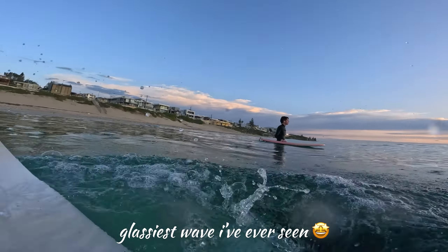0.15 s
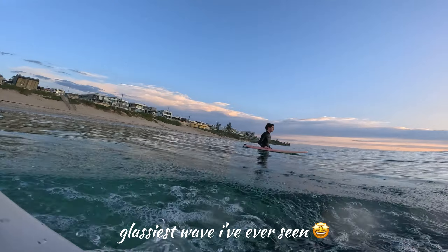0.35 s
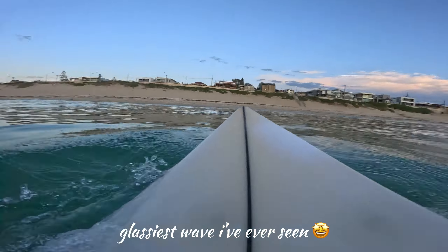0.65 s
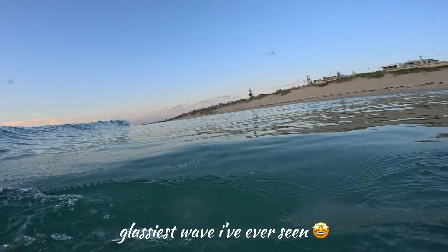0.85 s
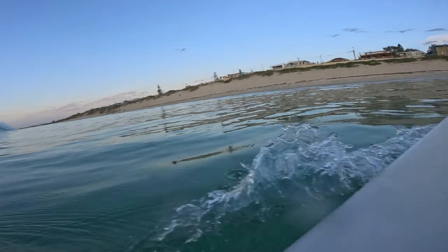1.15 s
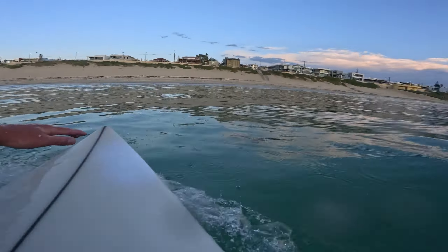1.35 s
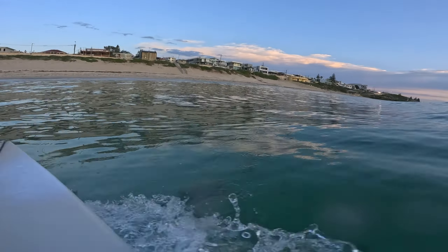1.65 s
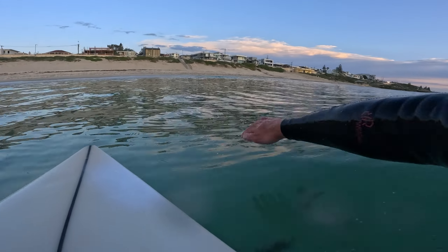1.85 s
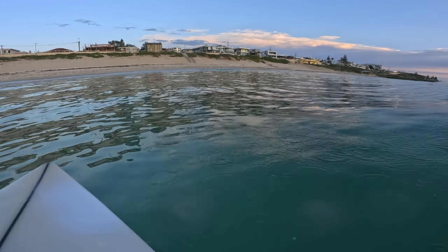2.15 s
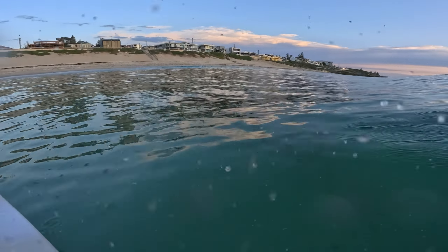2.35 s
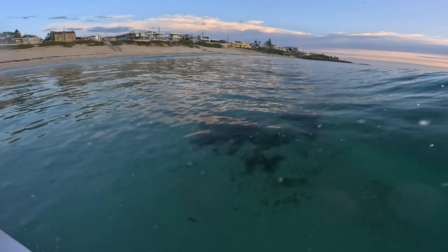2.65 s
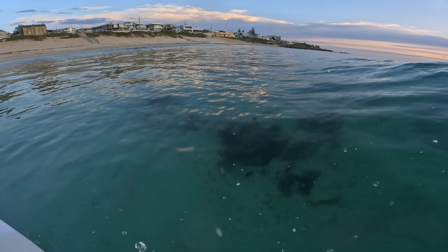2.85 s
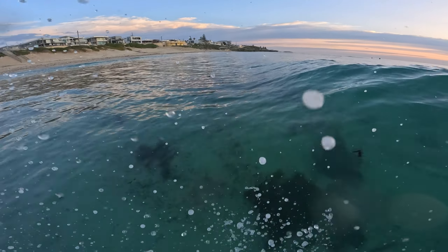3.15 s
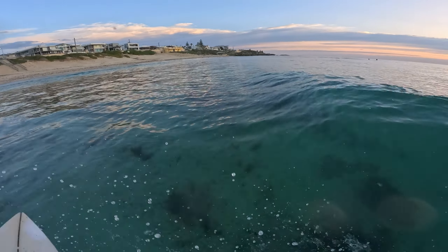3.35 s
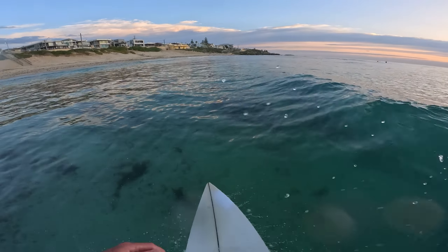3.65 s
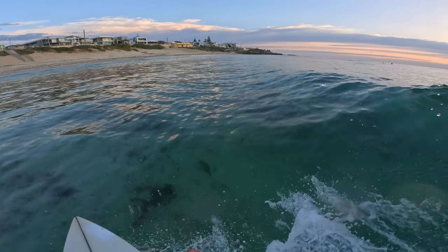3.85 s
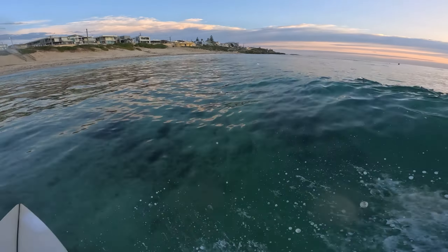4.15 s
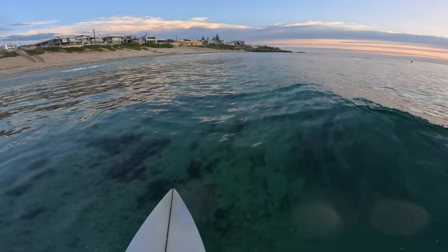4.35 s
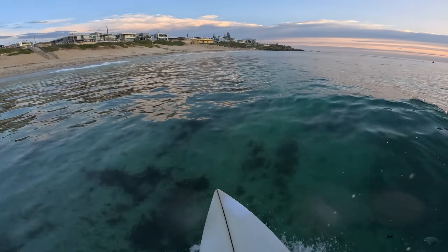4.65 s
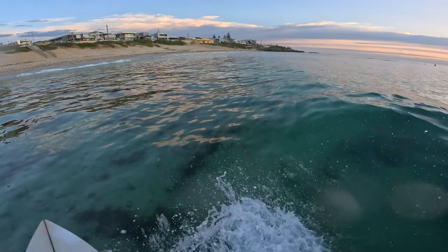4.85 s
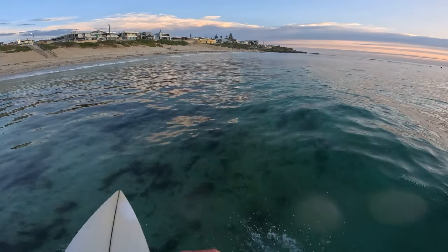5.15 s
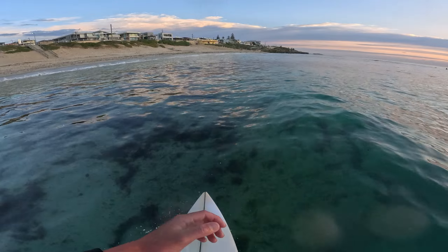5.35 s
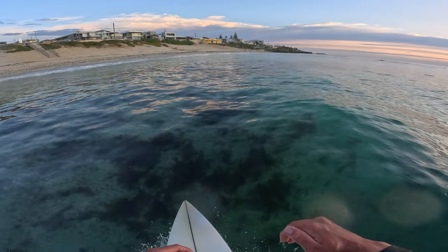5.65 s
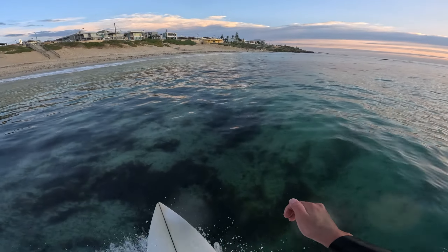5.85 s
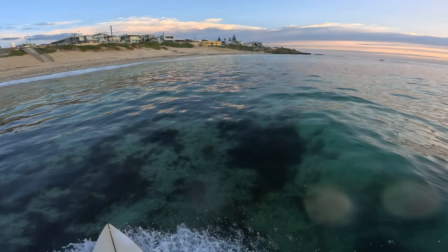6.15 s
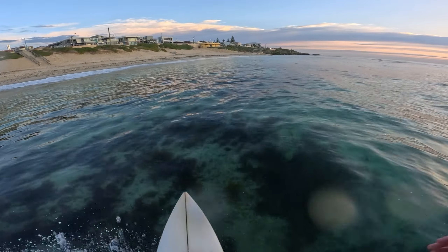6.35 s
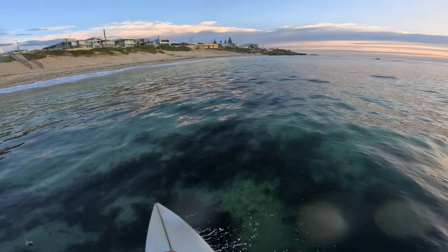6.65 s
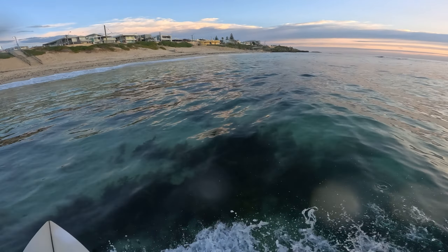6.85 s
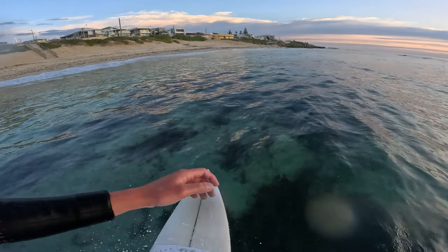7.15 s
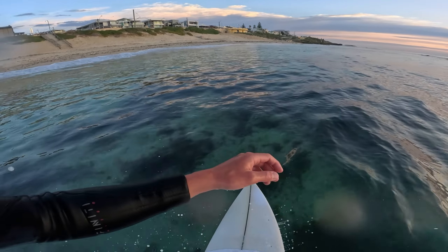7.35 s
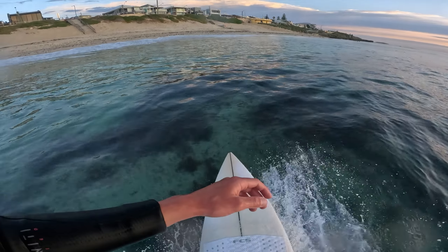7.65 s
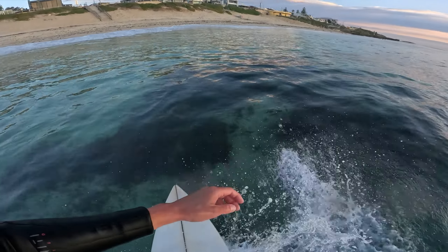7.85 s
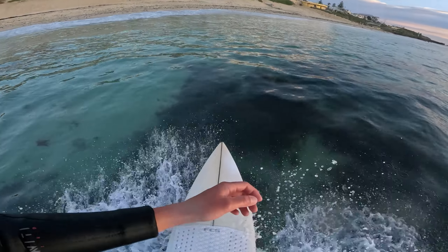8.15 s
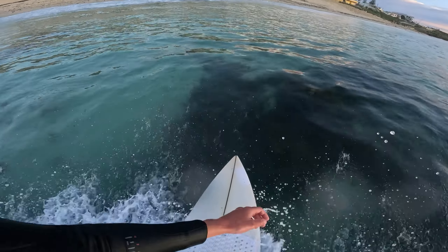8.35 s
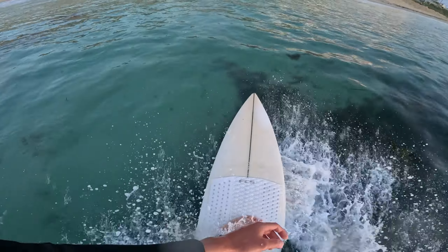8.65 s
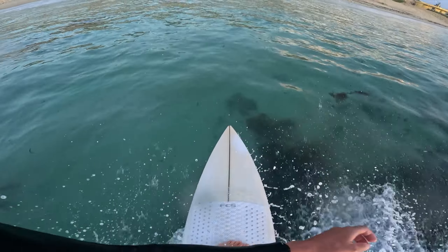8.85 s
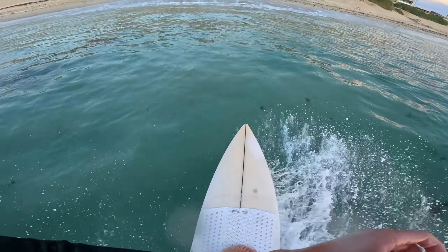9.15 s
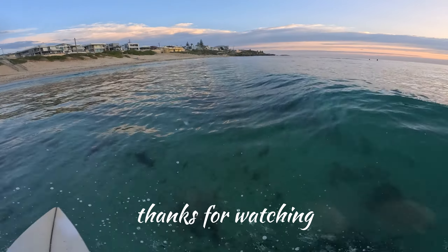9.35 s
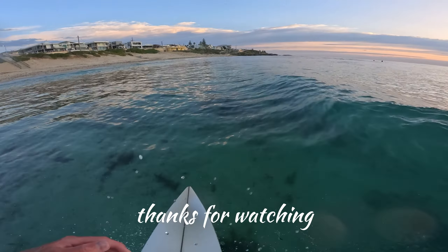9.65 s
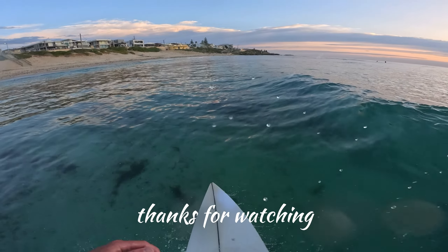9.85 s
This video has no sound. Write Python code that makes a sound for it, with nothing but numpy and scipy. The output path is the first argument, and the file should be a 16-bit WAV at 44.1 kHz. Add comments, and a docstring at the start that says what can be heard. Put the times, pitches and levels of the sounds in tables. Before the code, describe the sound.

Water rushes and fizzes along a surfboard at sea, bubbles blipping and drops ticking early, while low wind buffets the microphone, then cuts off abruptly.

```python
"""Low over a surfboard

Water rushes and fizzes along the rails: patchy noise in five registers, with swarms of damped sines for
droplets and small bubbles. Big bubbles and drops on the camera housing are single damped sines.
Wind buffets both ports as partly shared turbulent noise. The camera spreads the water over both channels
with a phase shift, the wash dips suddenly and creeps back, and the sound stops abruptly."""
import sys
import numpy as np
from scipy import signal
from scipy.fft import rfft, irfft, next_fast_len
from scipy.io import wavfile
from scipy.ndimage import uniform_filter1d, map_coordinates

SR = 44100
rng = np.random.default_rng(int(sys.argv[2]) if len(sys.argv) > 2 else 0)


def digitize_waveform(pressure):
    """Quantize a signal to 16-bit integers and store it at the path in sys.argv[1].

    Rows of a 2-D input are taken as channels; values are limited to [-1, 1].
    """
    field = np.atleast_2d(pressure).T
    bounded = np.clip(field, -1, 1)
    quanta = np.round(bounded * 32767).astype(np.int16)
    wavfile.write(sys.argv[1], SR, quanta)


N = 440994
STOP_S, TOP_HZ = 9.2512, 13400  # abrupt end, upper band limit
DIP_FALL_S = 0.004  # time constant of a dip's fall

# Wind at the ports: t/s, level/dB, then rumble/dB, rasp/dB, hollow tone/dB relative to the flutter
WIND_LEVELS = [(0, -45, -6, 0, -2.5), (.6, -45.5, 4.5, -1, 9.5), (1.1, -47.5, 10, 7.5, 14),
               (1.5, -43.5, 7.5, 1, 9), (1.8, -32.5, 2, -0.5, 0), (2.3, -31, -6.5, -2, 2.5),
               (2.5, -27, 0, -8.5, -0.5), (2.62, -23, -3.5, -6.5, -5), (3.1, -26, 2.5, -3.5, -3.5),
               (3.56, -27, 1.5, -0.5, 2.5), (3.85, -27.5, -2, 0, -1), (4.2, -26, -1, -10, -4.5),
               (4.9, -23.5, -1, -8, -4), (5.4, -29, 0.5, -10, -7.5), (5.9, -28.5, 0.5, -4, 1),
               (6.4, -31, 1, -2, 0.5), (6.7, -30, -0.5, -4, -2), (7, -27, -3, -8.5, -2),
               (7.7, -27.5, 1, 2, -9.5), (8.2, -27.5, -0.5, 0, -5.5), (8.7, -26.5, 4, 1.5, 1),
               (9.25, -28.5, 0.5, 1, -4)]
# Where the wind strikes, left over right: t/s, flutter and rasp/dB, rumble/dB
WIND_FACING = [(0, -2, 3.5), (.55, -2, 2.5), (.8, 2.5, 0), (1.5, 6, 5), (1.7, 3, -12.5), (2.25, 0, -16.5),
               (2.4, -1.5, -2), (3.2, 5.5, -7.5), (3.8, 6, -18), (4.3, -4, -5.5), (5.5, 0, -5.5),
               (6, -1.5, -6.5), (6.5, -0.5, -7.5), (7.4, -1.5, -4), (9.25, 0, -3)]
# Puffs on the left port: t/s, half-width/s, left over right/dB, lift of rasp and hollow tone/dB
WIND_PUFFS = [(1.75, 0.085, 5.5, -3), (2.24, 0.045, 2, -1), (2.58, .08, 4.5, 2.5), (3.28, 0.069, 4, -2),
              (3.62, 0.046, 4.5, -2.5), (3.79, 0.038, 2, 1.5), (4.1, 0.11, 6.5, 2.5), (7.1, 0.056, 13.5, 4),
              (7.65, 0.11, 10, 2), (8.117, 0.067, 16, 1), (8.66, 0.12, 9.5, -4), (9.12, 0.073, 8, -3)]
# Short gusts and lulls: t/s, half-width/s, flutter/dB, rumble/dB, rasp and hollow tone/dB
WIND_GUSTS = [(0.04, 0.044, 5, -4, -1), (0.19, 0.056, 18, 16, 8.5), (0.32, 0.034, 1, 2, 0),
              (0.44, 0.081, -6.5, -8, 0), (0.56, 0.0233, -3.5, 10, -4.5), (0.69, 0.028, 14, -5, 0.5),
              (0.77, 0.043, -7, 13.5, 1), (0.88, 0.027, -11, -2, -11), (1.07, 0.05, -12, -12, 2.5),
              (1.46, 0.087, -3, -8, 0.5), (1.6, 0.099, -6, 3, 7), (2.16, 0.062, 4.5, 7.5, 5.5),
              (2.3, 0.026, 3.5, -11.5, -9), (2.44, 0.061, -1, -5, -2), (3.24, 0.04, -0.5, 5, 3.5),
              (3.47, 0.085, -2.5, -1.5, -13), (3.6, 0.04, 1, 3, 4), (3.72, 0.075, 2, 2.5, 2),
              (4.86, 0.08, 0, -8, -1), (5.08, 0.048, -9, 1.5, -1.5), (5.36, 0.017, 12, -11, 1),
              (5.44, 0.16, 0.5, -1, 9.5), (6.52, 0.019, 10.5, -3, -1), (6.66, 0.13, 0.5, 2, 7),
              (6.97, 0.062, -8.5, -5.5, -3.5), (7.03, 0.022, -10, -3, -8), (7.78, .04, -2, 1, -4),
              (7.4, 0.1, 1.5, 0.5, 5), (7.5, 0.021, -3, -10, -11), (8.34, 0.16, -2.5, -6.5, -1.5),
              (8.71, 0.16, -5, 1.5, -1.5), (8.93, 0.05, -4, -10.5, -0.5), (9.02, 0.044, -6, -11, -5)]
# Slow pressure swings: t/s, level/dB
HEAVE_LEVEL = [(0, -36.5), (.5, -31), (.7, -27), (1.25, -22), (1.67, -33), (2.3, -30), (2.5, -17.5),
               (2.75, -31), (3.09, -17), (3.3, -34), (4.1, -29), (4.9, -22.5), (5.3, -28), (5.95, -29.5),
               (6.7, -37), (7.1, -23), (7.35, -31), (7.9, -25), (8.32, -33.5), (8.7, -24.5), (9.25, -30.5)]
# Single wind thumps before a common trim: t/s, level/dB, f/Hz, left over right/dB
WIND_THUMPS = [(0.146, -13, 209, -2.0), (0.548, -16, 140, -5.5), (2.078, -14.5, 121, -5),
               (2.231, -14, 202, -9), (2.555, -15, 146, 5), (2.911, -10.5, 200, 3),
               (3.023, -10.5, 73.6, -2), (3.214, -15.5, 72, 2), (3.257, -7.5, 543, 11), (3.57, -8, 567, 9),
               (3.37, -7, 101, -5), (4.232, -11, 109.5, 0), (4.403, -11, 157, -1), (5.336, -15.5, 105, -3),
               (5.485, -7, 336, -4), (6.5113, -6, 157, -5.5), (7.07, -8.5, 600, 11), (7.074, -11, 220, 0),
               (7.115, -9.5, 410, 11), (7.234, -11.5, 120, -5), (7.247, -10.5, 294, -4),
               (7.38, -11.5, 302, 1.5), (7.586, -7, 203, 2), (7.621, -10, 226, 6.5), (7.672, -12, 480, 10),
               (7.697, -10, 200, 0), (8.042, -17, 61.7, 3), (8.057, -9, 250, 3), (8.07, -7.5, 293, 6.5),
               (8.122, -15, 360, 3), (8.191, -15, 63, 8), (8.388, -8.5, 230, -2), (8.558, -12, 119, -2),
               (8.716, -9.5, 74, 1.5), (8.79, -9.5, 124, 6), (8.92, -9.5, 358, 0), (9.075, -14, 136, 6)]
# Spectral colour of the wind at the left port: f/Hz, level/dB
WIND_COLOUR_LEFT = [(40, 5.5), (80, 1), (160, 1.5), (300, -5.5), (480, -14), (650, -4.5), (800, -9.5),
                    (1000, -21.5), (1400, -53.5)]
# Spectral colour of the wind at the right port: f/Hz, level/dB
WIND_COLOUR_RIGHT = [(40, 4), (80, 4.5), (160, 0), (300, -4.5), (480, -9.5), (620, -19), (720, -37.5),
                     (900, -46)]
# Wash before the camera's colouring: t/s, level/dB, then gurgle/dB, spray/dB, top hiss/dB above the fizz
WASH_LEVELS = [(0, -21.5, 1, 1.5, 9.5), (.18, -19.5, 4, -2, 1), (.3, -17.5, 2, -1, -1.5),
               (.4, -19.5, 4, 3, 4), (.47, -23, 10, 4.5, 8), (.57, -20.5, 11.5, 5, 12),
               (.72, -23.5, 7.5, 3, 6.5), (.83, -18.5, 1.5, -0.5, 2.5), (1.1, -20.5, 5, 5, 5),
               (1.6, -21, 7, 3, 7), (1.85, -18.5, 5, 3, -1.5), (2.2, -18.5, 3, 2, 5), (2.6, -19, 7, 9, 6.5),
               (3.1, -18, 6.5, 4, 4.5), (3.5, -19, 3, 5, 3), (3.7, -22, 3.5, 5.5, -1.5),
               (3.95, -16.5, 1, 3.5, -6.5), (4.3, -19, 5.5, 4.5, -1.5), (4.6, -18, 5, 6, -1),
               (5.2, -18.5, 5.5, 6, 8.5), (5.42, -20, 10.5, 5.5, 5.5), (5.62, -16.5, 0.5, 1, 4.5),
               (5.95, -17.5, 4, 6, 9), (6.55, -15.5, 4, 2.5, 4.5), (6.9, -19.5, 0.5, 6.5, 10),
               (7.25, -20, 8, 4.5, 1.5), (7.8, -16, -1, 0.5, -0.5), (8.6, -17, 2.5, 3, 3),
               (8.95, -15, 1.5, 1.5, 1.5), (9.25, -17.5, -1.5, 1, 11)]
# Hollow middle register of the foam: t/s, level above the fizz/dB
MIDDLE_LEVEL = [(0, 3), (.3, 1), (.55, 5), (.62, 8.5), (.74, 6.5), (.77, 4.5), (1.05, 8.5), (1.3, 7),
                (1.6, 9), (1.9, 4.5), (2.2, 5.5), (2.5, 1.5), (2.75, 7.5), (3, 2.5), (3.3, -1), (3.7, 4),
                (4, 1.5), (4.3, 2), (4.5, 0.5), (4.75, 0.5), (4.9, 5.5), (5.15, 2.5), (5.4, 8.5),
                (5.6, -1.5), (5.95, -4), (6.15, 3), (6.5, 2.5), (6.8, 2), (7, 1.5), (7.2, 6), (7.6, 2),
                (8, 1), (8.4, 3), (8.7, -1.5), (8.9, 5), (9.25, -0.5)]
# Crackle mixed into the foam: t/s, share of droplets, share of small bubbles
CRACKLE_SHARES = [(0, 0.46, 0.37), (.45, 0.46, .3), (.65, 0.5, 0.32), (1, 0.42, 0.36), (2.3, 0.34, 0.31),
                  (2.8, 0.174, 0.3), (4, 0.22, 0.27), (9.3, 0.18, 0.13)]
# Splashes that swell out of the wash: t/s, half-width/s, rise/dB
SPLASH_SWELLS = [(.125, 0.014, 6), (.262, .014, 3), (.225, .012, -1), (.365, 0.015, 3.5), (.41, 0.013, 3.5),
                 (.51, 0.013, -0.5), (.84, 0.034, -1), (1.24, .03, 0), (1.37, 0.038, 2), (1.46, 0.016, 2),
                 (1.9, 0.06, 0.5), (2.09, 0.012, 3.5), (2.19, 0.023, 1.5), (2.245, 0.0091, 2.5),
                 (2.36, 0.0096, 1.5), (2.67, 0.023, -0.5), (3.05, 0.022, 0.5), (3.91, .04, 1.5),
                 (4.64, 0.02, 1), (4.74, 0.025, 2), (5.2, 0.027, -1), (6.18, 0.044, -1.5), (6.59, .04, -1),
                 (6.4, .04, -2), (6.78, 0.055, 3), (6.835, 0.0073, 5), (6.96, 0.059, 1.7),
                 (7.21, 0.04, 2.5), (7.47, 0.028, 2), (7.57, 0.015, 0.5), (8.22, .02, -0.5),
                 (8.94, .03, 1.5), (9.21, 0.036, 3)]
# Sudden dips of the wash: t/s, depth setting/dB, recovery time constant/s
WASH_DIPS = [(0.035, 7, 0.032), (0.143, 4, 0.048), (0.276, 9.5, 0.049), (0.53, 4.5, 0.098),
             (0.592, 15, 0.062), (0.645, 3.5, 0.08), (0.725, 5, 0.018), (0.845, 0, 0.112), (0.89, 6, 0.078),
             (0.96, 5.5, 0.027), (1.102, 9, 0.022), (1.231, 8, 0.015), (1.372, 8.5, 0.03),
             (1.47, 5.5, 0.016), (1.625, 2, 0.094), (1.912, 9.5, 0.022), (2.38, 10.5, 0.039),
             (2.52, 6, 0.06), (2.71, 10.5, 0.015), (3.253, 11.5, 0.023), (3.595, 6.5, 0.045),
             (3.78, 5, 0.067), (4.41, 3.5, 0.1), (4.575, 4.5, 0.043), (4.67, 6, 0.019), (5.115, 4, 0.025),
             (6.23, 10.5, 0.06), (6.62, 7, 0.035), (6.847, 5.5, 0.025), (7.592, 7, 0.062),
             (8.11, 4.5, 0.07), (8.86, 6.5, 0.086)]
# Drops on the housing before trims and colouring: t/s, level/dB, f/Hz, bright edge above that level/dB
HOUSING_DROPS = [(0.005, -16, 3000, -26), (0.0094, -8.5, 3550, -29), (0.0293, -6, 4770, -21),
                 (0.072, -18, 4400, -13), (0.117, -15, 3800, -10), (0.141, -6, 3700, -27),
                 (0.178, -9.5, 3830, -25.5), (0.1932, -10, 3360, -20.5), (0.2571, -16, 3530, -23),
                 (0.2746, -8, 3990, -22), (0.3403, -15.5, 3890, -16.5), (0.3576, -15.5, 3340, -25),
                 (0.3952, -20.5, 3650, -19), (0.422, -11, 3600, -24), (0.488, -16, 4500, -11),
                 (0.554, -13, 4260, -5.5), (0.5897, -4.5, 3210, -24.5), (0.603, -25, 3940, -7.5),
                 (0.612, -25, 3360, -2), (0.6676, -14.5, 4440, -23.5), (0.7118, -14, 3880, -26),
                 (0.775, -24, 4090, -19), (0.812, -16, 3000, -26), (0.8286, -8, 3210, -23),
                 (0.9192, -15, 3970, -10), (1.077, -17.5, 3470, -14), (1.225, -11, 3930, -16.5),
                 (1.247, -26, 3880, -25), (1.3481, -10.5, 3960, -24), (1.4965, -22.5, 3200, -20),
                 (1.7227, -10, 2600, -30), (1.8057, -15, 3630, -17), (2.0777, -9, 3950, -17),
                 (2.1066, -14, 3180, -8.5), (2.177, -21, 3690, -21), (2.358, -21, 3760, -23),
                 (2.4313, -35, 3630, -14.5), (3.027, -8.5, 3650, -27.5), (3.6562, -11.5, 3330, -16),
                 (4.4097, -11, 3650, -27), (4.526, -10, 3580, -23), (6.2265, -11.5, 3930, -34),
                 (6.836, -11, 4300, -16), (8.8696, -11, 3420, -19)]
# Big bubbles before colouring: t/s, level/dB, f/Hz at the start, decay time constant/ms
BIG_BUBBLES = [(.075, -11.5, 940, 4), (.228, -12, 1160, 3.4), (.272, -5, 1290, 1.7), (.378, -9, 450, 4),
               (.401, -20, 1294, 3), (.408, -9.5, 782, 3.7), (0.434, -4, 433, 3.6), (.468, -5.5, 584, 2.6),
               (.481, -12, 1674, 3), (.514, -8.5, 1460, 3), (.517, -6.5, 847, 3.1), (.547, -9, 698, 5.8),
               (.553, -8.5, 1194, 3), (.579, -13.5, 796, 5.5), (.778, -8, 1540, 3), (.869, -12, 1010, 3),
               (.937, -6, 565, 3), (1.011, -6, 560, 2.5), (1.074, -13, 1400, 6.1), (1.129, -10, 1437, 6.9),
               (1.153, -8, 1410, 3.2), (1.174, -6.5, 1146, 3), (1.188, -9, 616, 4), (1.219, -7, 1750, 3.4),
               (1.268, -11, 725, 3), (1.288, -8, 980, 9), (1.542, -10.5, 632, 5.3),
               (1.566, -12.5, 549, 7.7), (1.603, -7.5, 344, 12), (1.62, -5, 1240, 3.2),
               (1.632, -6.5, 640, 3.9), (1.641, -7.5, 940, 4.6), (1.713, -9.5, 644, 3),
               (1.747, -9.5, 828, 3), (1.906, -9, 765, 6), (2.024, -9, 1420, 3), (2.141, 0.5, 366, 2.2),
               (2.166, -13.5, 534, 7), (2.237, -8, 700, 8.4), (2.243, -2.5, 1110, 1.5),
               (2.347, -15.5, 1065, 6.9), (2.399, 0, 770, 2.2), (2.466, -9.5, 1740, 3.4),
               (2.718, -10, 1094, 6.3), (4.858, -14, 1050, 3), (5.378, -14, 890, 3.8),
               (5.899, -16, 1240, 4.7), (6.624, -4.5, 706, 4.6), (7.245, -8.5, 1060, 4.5),
               (7.714, -12, 1020, 4.9)]
# How the left channel colours water: f/Hz, level/dB
WATER_COLOUR_LEFT = [(150, -9.5), (450, -24.5), (640, 2.5), (900, -0.66), (1300, -6.5), (2200, -9.5),
                     (3200, -4.5), (4000, -10), (4500, -19), (5000, -50.5), (5800, -76.5), (11200, -77.5),
                     (12300, -51.5), (13200, -56.5)]
# How the right channel colours water: f/Hz, level/dB
WATER_COLOUR_RIGHT = [(150, -8.5), (600, -5.5), (800, -9), (1100, -6.5), (2000, -7.5), (3000, -0.5),
                      (3900, 2.5), (4800, -6), (6500, -11), (8000, -28.5), (9800, -63), (11000, -43),
                      (12000, -40), (13200, -58.5)]
# Phase lead of the left channel: f/Hz, phase/rad
LEFT_PHASE_LEAD = [(150, .3), (350, .5), (500, -1), (690, -3.1), (800, -4.1), (1000, -4.68), (8000, -4.71)]


def amp(db):
    """Gain of a level in dB."""
    return 10 ** (np.asarray(db) / 20)


def unit(x):
    """Each channel at rms 1."""
    return x / np.sqrt(np.mean(x ** 2, -1, keepdims=True) + 1e-20)


def along(points, hz):
    """Value at hz between (f/Hz, value) points on a log axis."""
    f, value = np.transpose(points)
    return np.interp(np.log(hz + 1), np.log(f + 1), value)


def curves(rows):
    """One value per sample for each column after the time."""
    s, *columns = np.transpose(rows)
    return [np.interp(np.arange(N) / SR, s, column) for column in columns]


def bumps(rows):
    """Bell-shaped swells (t/s, half-width/s, heights..) summed for each height column."""
    s, half_width, *heights = np.transpose(rows)
    coarse = np.arange(0, N, 64)  # the bells are smooth enough for every 64th sample
    bells = np.exp(-((coarse[:, None] / SR - s) / half_width) ** 2)
    return [np.interp(np.arange(N), coarse, bells @ height) for height in heights]


def wobble(rate):
    """A smooth random curve, rate knots a second."""
    knots = rng.standard_normal(int(N * rate / SR) + 4)
    return map_coordinates(knots, [np.arange(N) * rate / SR])


def filtered(x, response):
    """x times a complex response of frequency, zero-padded so the tail does not wrap round to the start."""
    m = next_fast_len(N + SR // 2)
    return irfft(rfft(x, m) * response(np.fft.rfftfreq(m, 1 / SR)), m)[..., :N]


def band(lo_hz, hi_hz, order=3):
    """Gain of a smooth band."""
    def gain(f):
        below = (lo_hz / (f + 1e-3)) ** (2 * order)
        above = (f / hi_hz) ** (2 * order)
        return 1 / np.sqrt((1 + below) * (1 + above))
    return gain


def sides(pan_db):
    """Left and right gains of a left-right difference in dB."""
    return amp(np.array([pan_db / 2, -pan_db / 2]))


def grains(s, hz, gain, cycles, rise, size):
    """Soft-started sines that decay over some cycles; pitch climbs with rise, or falls if it is negative."""
    turns = np.arange(size) / SR * hz[:, None]
    life = turns / cycles
    envelope = gain[:, None] * np.exp(-life) * (1 - np.exp(-6 * life))
    wave = envelope * np.sin(2 * np.pi * turns * (1 + rise * life))
    at = (s * SR).astype(int)[:, None] + np.arange(size)
    return np.bincount(at.ravel(), wave.ravel(), N + size)[:N]


def swarm(count, hz, spread, cycles, rise, scatter_db, size):
    """Many grains at random times, pitches and levels, rms 1 in all."""
    s = rng.random(count) * N / SR
    pitch = np.clip(hz * np.exp(spread * rng.standard_normal(count)), 100, 9000)
    loud = np.minimum(rng.exponential(size=count), 2.4)  # a cap on the loudest
    return unit(grains(s, pitch, amp(scatter_db * loud), cycles, rise, size))


def patchy(depth_db):
    """White noise whose gain drifts in patches of time and pitch."""
    z = signal.stft(rng.standard_normal(N), nperseg=256)[2]
    field = uniform_filter1d(rng.standard_normal(z.shape), 5, 0)  # smooth over pitch
    field = uniform_filter1d(field, 9, 1)  # smooth over time
    return unit(signal.istft(z * amp(depth_db * field / field.std()), nperseg=256)[1][:N])


def eddies(response, alike, lumpy_db, rate, lag_s=0):
    """Lumpy turbulence, partly shared; the shared part reaches the right port lag_s later (negative: earlier)."""
    common, own = rng.standard_normal(N), rng.standard_normal((2, N))
    common = np.array([common, np.roll(common, round(lag_s * SR))])
    air = filtered(np.sqrt(alike) * common + np.sqrt(1 - alike) * own, response)
    lumps = np.array([wobble(rate), wobble(rate)])
    return unit(unit(air) * amp(lumpy_db * lumps))


def heave():
    """Slow pressure swings of 5-14 Hz that wander between the ports."""
    swing = eddies(band(5, 14), alike=.4, lumpy_db=1.0, rate=4)
    return amp(curves(HEAVE_LEVEL)[0]) * sides(2.5 + 3.5 * wobble(3)) * swing


def thumps():
    """Single wind thumps: low damped sines of slightly falling pitch, placed left or right."""
    s, db, hz, pan_db = np.transpose(WIND_THUMPS)
    return np.array([grains(s, hz, amp(db - 3.0) * side, cycles=1.9, rise=-0.0096, size=4000)
                     for side in sides(pan_db)])


def air_stream():
    """Turbulence in bands of rumble, flutter and rasp, with a hollow tone mostly at the left port."""
    level_db, rumble_db, rasp_db, hollow_db = curves(WIND_LEVELS)
    flutter_pan, rumble_pan = curves(WIND_FACING)
    puff_pan, puff_db = bumps(WIND_PUFFS)
    flutter_gust, rumble_gust, rasp_gust = bumps(WIND_GUSTS)

    def colour(f):
        return amp([along(WIND_COLOUR_LEFT, f), along(WIND_COLOUR_RIGHT, f)])

    # higher bands break up into faster lumps
    rumble = eddies(lambda f: colour(f) * band(22, 125, order=4)(f), alike=0.48, lumpy_db=1.1, rate=11)
    flutter = eddies(lambda f: colour(f) * band(125, 300, order=4)(f),
                     alike=0.76, lumpy_db=1.5, rate=25, lag_s=.00045)
    rasp = eddies(lambda f: colour(f) * band(300, 650, order=4)(f),
                  alike=0.65, lumpy_db=2.5, rate=40, lag_s=.00025)
    hollow = eddies(lambda f: colour(f)[0] * band(560, 800)(f),
                    alike=0.8, lumpy_db=2.0, rate=35, lag_s=-.0006)

    rumble = amp(rumble_db + rumble_gust + 0.36 * wobble(7.7)) * sides(rumble_pan + puff_pan) * rumble
    flutter = amp(flutter_gust) * flutter
    rasp = amp(rasp_db + puff_db + rasp_gust + 1.3 * wobble(12)) * rasp
    port_db = np.array([[1.5], [-12]])  # left, right
    hollow = amp(hollow_db + puff_db + rasp_gust + 1.1 * wobble(14) + port_db) * hollow
    stream = rumble + sides(flutter_pan + puff_pan) * (flutter + rasp) + hollow
    return amp(level_db + 0.3 * wobble(8)) * stream


def wind():
    """Wind on both ports: the turbulent stream, slow heave and single thumps."""
    return air_stream() + heave() + thumps()


def dips():
    """Level in dB that falls quickly at each dip and recovers exponentially."""
    db = np.zeros(N + SR)
    t = np.arange(SR // 2) / SR
    for s, depth_db, recover_s in WASH_DIPS:
        shape = np.exp(-t / recover_s) * (1 - np.exp(-t / DIP_FALL_S))
        db[round(s * SR):][:len(t)] -= depth_db * shape
    return db[:N]


def wash():
    """Foam hiss in five registers, textured with crackling droplets and small bubbles."""
    fizz_db, gurgle_db, spray_db, top_db = curves(WASH_LEVELS)
    droplets, bubbles = curves(CRACKLE_SHARES)
    churn_db = 0.26 * wobble(9) + 0.32 * wobble(24) + 0.51 * wobble(120)  # the whole foam flickers
    churn_db = churn_db + droplets * (0.69 * wobble(35) + 0.4 * wobble(17))  # more droplets, more flicker

    foam = patchy(depth_db=1.5)
    foam = foam + droplets * swarm(count=3500, hz=3790, spread=.45, cycles=1.8,
                                   rise=0.05, scatter_db=2.5, size=160)
    slosh = patchy(depth_db=1.5)
    slosh = slosh + bubbles * swarm(count=2500, hz=998.3, spread=0.601, cycles=3.5,
                                    rise=.08, scatter_db=1.0, size=900)

    fizz = filtered(foam, band(2700, 4120, order=4))
    spray = amp(spray_db + 0.53 * wobble(5.5)) * filtered(foam, band(4230, 8800))
    top = amp(top_db) * filtered(foam, band(9660, 19000, order=6))
    gurgle = amp(gurgle_db + 0.42 * wobble(6)) * filtered(slosh, band(55, 1210, order=4))
    middle = filtered(slosh + 0.33 * foam, band(1455, 2350, order=4))
    middle = amp(curves(MIDDLE_LEVEL)[0] + 0.57 * wobble(8)) * middle

    level_db = fizz_db + churn_db + bumps(SPLASH_SWELLS)[0] + dips()
    return amp(level_db) * (fizz + spray + top + middle + gurgle)


def big_bubbles():
    """Bursting bubbles: damped sines whose pitch rises as they ring."""
    s, db, hz, decay_ms = np.transpose(BIG_BUBBLES)
    cycles = (hz * decay_ms / 1e3)[:, None]
    return grains(s, hz, amp(db), cycles=cycles, rise=.16, size=2600)


def housing_drops():
    """Drops on the housing: a tick of under two cycles plus a bright edge at 6.3 kHz."""
    s, db, hz, edge_db = np.transpose(HOUSING_DROPS)
    ticks = grains(s, hz, amp(db + 7.0), cycles=1.72, rise=0.0087, size=400)
    edge_hz = np.full_like(s, 6300)
    edges = grains(s, edge_hz, amp(db + edge_db + 22.0), cycles=5.7, rise=0.0068, size=400)
    return ticks + edges


def spread_water(water):
    """The camera puts the same water on both channels, coloured apart and the left one phase shifted."""
    def response(f):
        colour = amp([along(WATER_COLOUR_LEFT, f), along(WATER_COLOUR_RIGHT, f)]) * band(60, 20000)(f)
        left_only = np.array([[1], [0]])
        # about -3/4 turn above 1 kHz, the same as a quarter-turn lead
        return colour * np.exp(1j * along(LEFT_PHASE_LEAD, f) * left_only)
    return filtered(water, response)


def scene():
    """Wind on the ports, and water along the board as the camera spreads it."""
    return wind() + spread_water(wash() + big_bubbles() + housing_drops())


def record(dry):
    """The sudden stop, then the band limit."""
    stopped = dry * (np.arange(N) < STOP_S * SR)
    return filtered(stopped, lambda f: f < TOP_HZ)


dry = scene()
out = record(dry)
digitize_waveform(out)
```